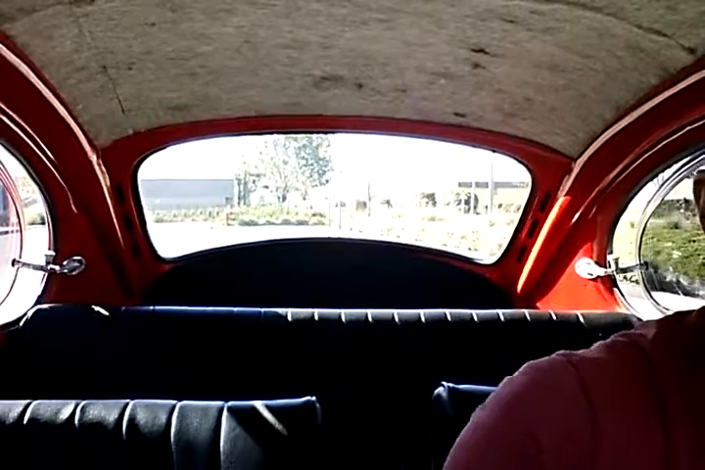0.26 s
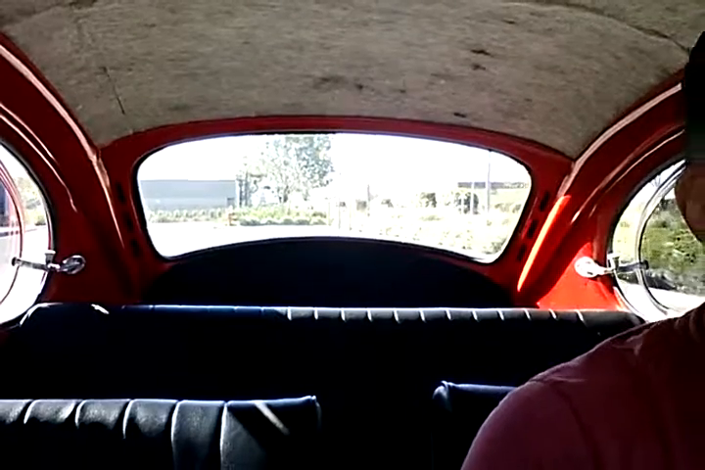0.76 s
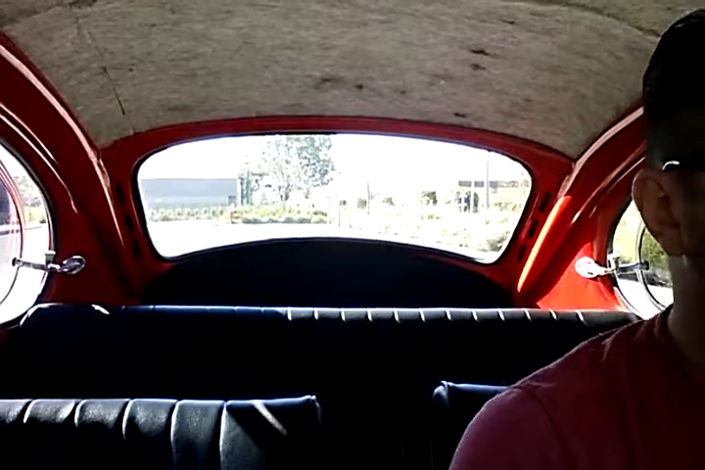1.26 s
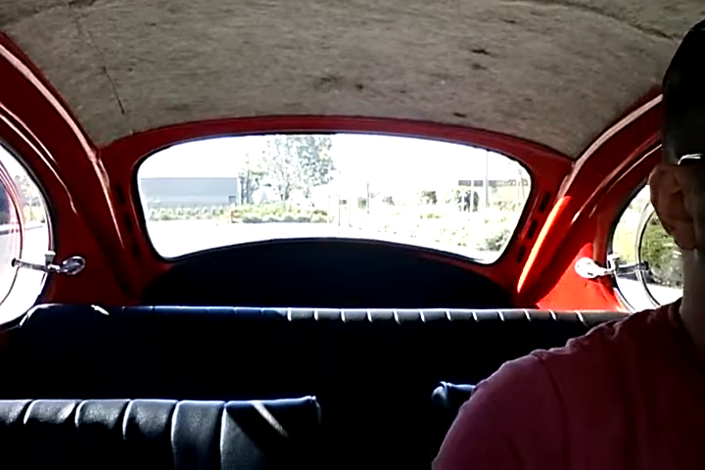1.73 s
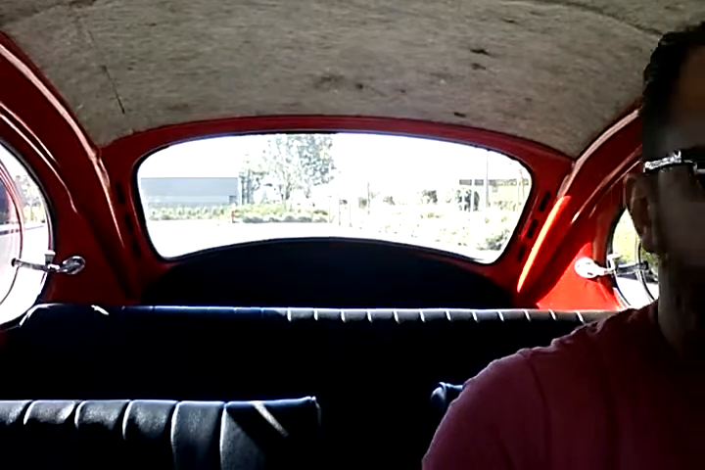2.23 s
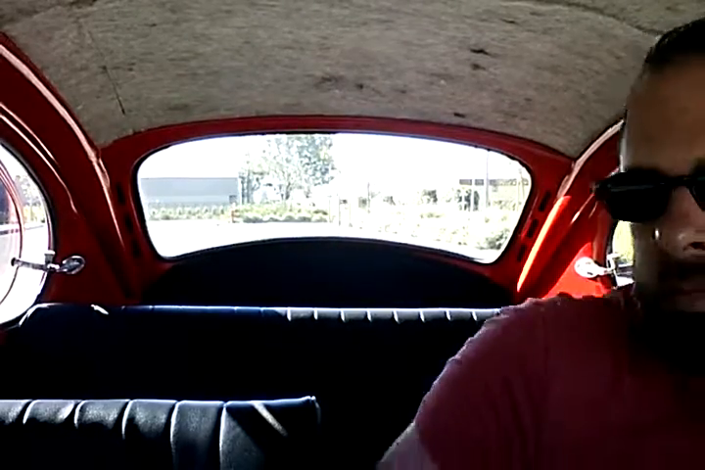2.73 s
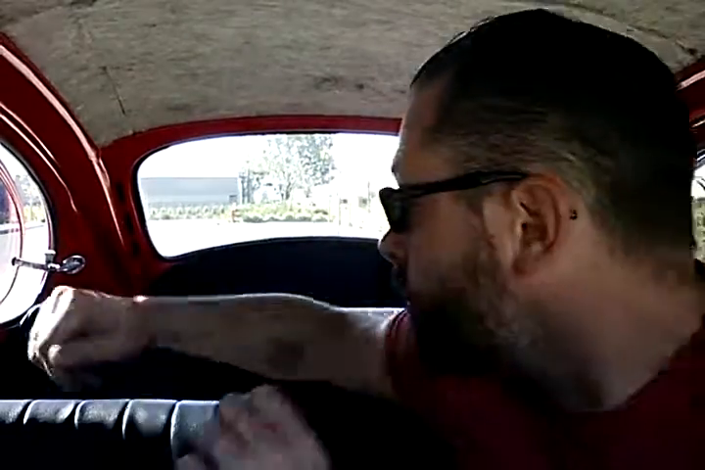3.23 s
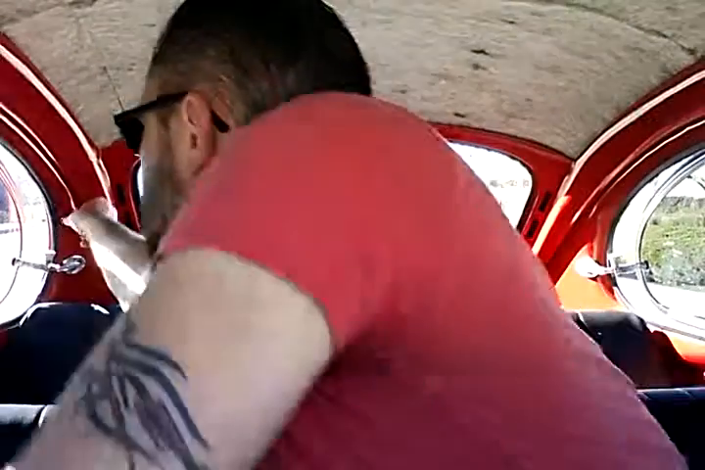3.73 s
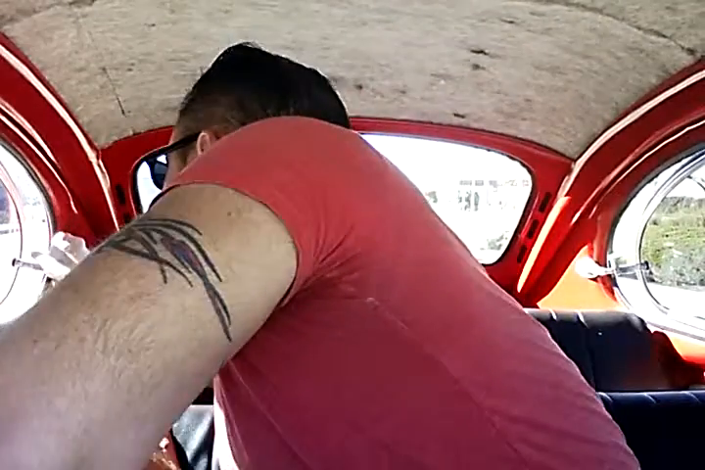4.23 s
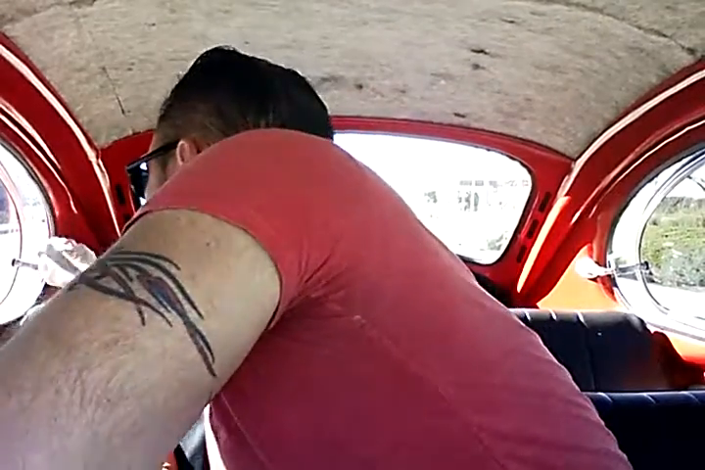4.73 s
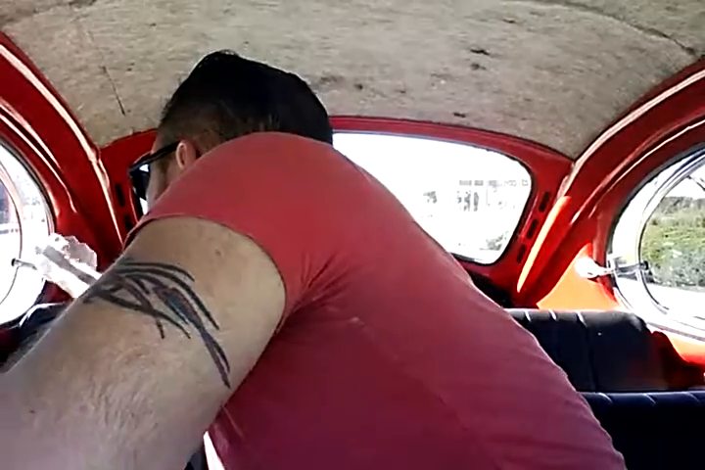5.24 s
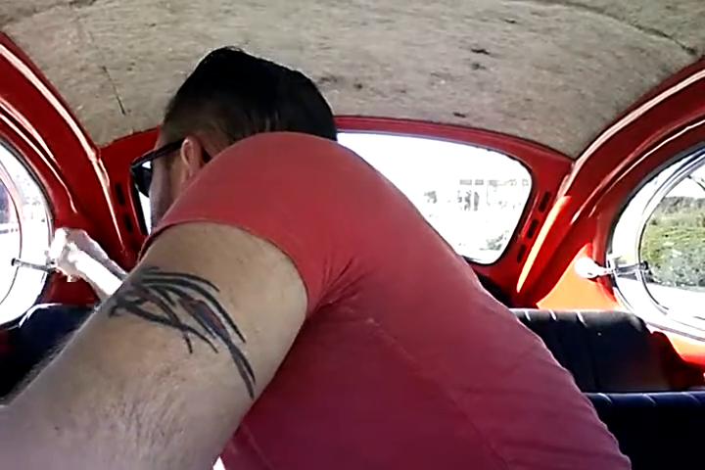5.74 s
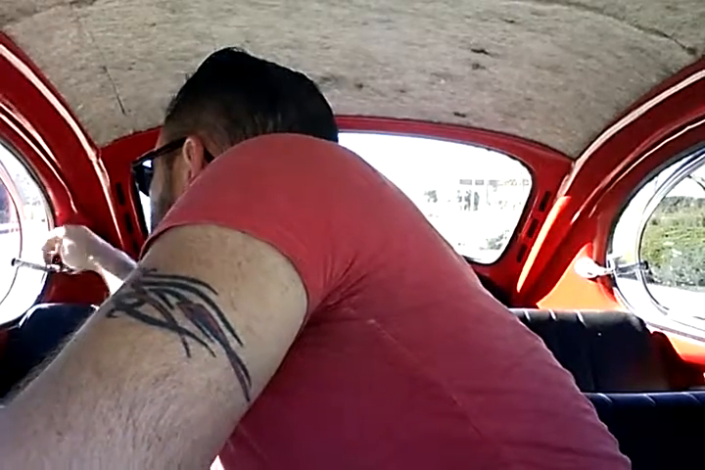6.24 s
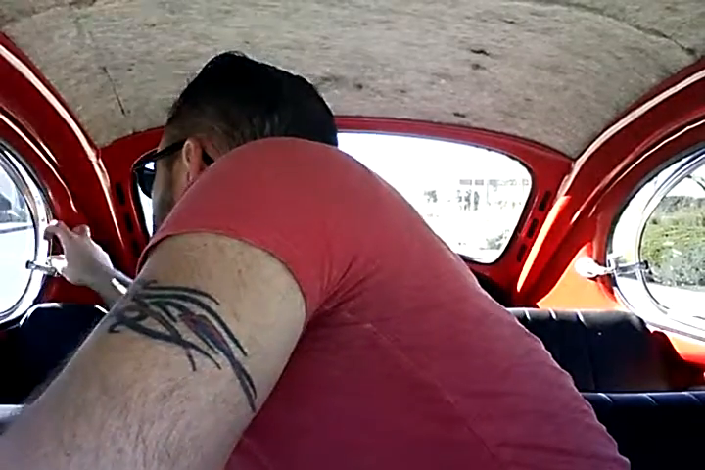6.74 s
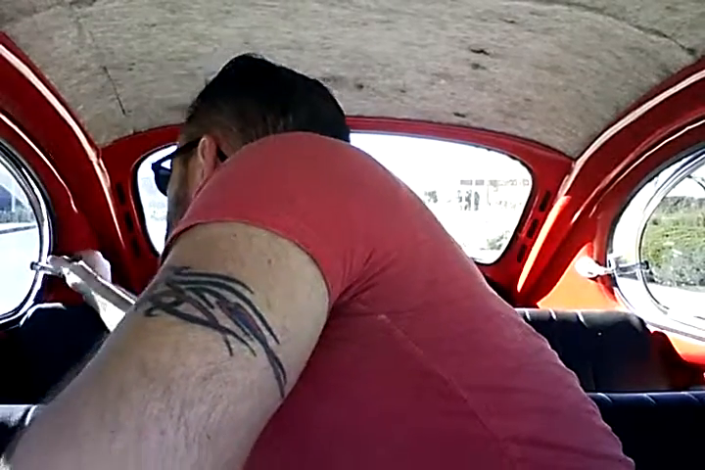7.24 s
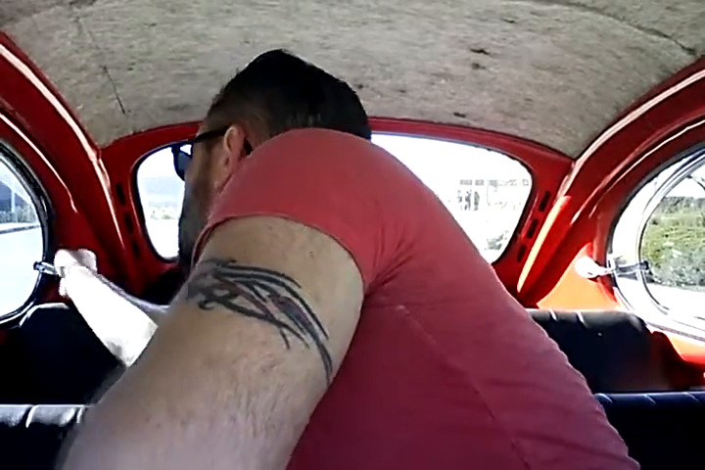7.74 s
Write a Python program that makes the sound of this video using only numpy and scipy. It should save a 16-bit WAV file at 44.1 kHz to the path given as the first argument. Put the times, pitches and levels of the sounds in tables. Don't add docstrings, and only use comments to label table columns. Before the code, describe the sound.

A small old car's air-cooled engine idles unevenly behind the seats, booming low with panel drone, valve ticking and faint fan whir. Close to the microphone, light clicks give way to hard buckle snaps, vinyl squeaks and cloth rustle around two to three seconds. A heavy body lands on the springs, then dull thumps. Later, a hand knocks the window and its latch clicks, with a tiny high metallic zing near seven seconds.

```python
import sys
import numpy as np
from scipy import signal
from scipy.fft import rfft, irfft
from scipy.io import wavfile
from scipy.ndimage import uniform_filter1d

SR = 44100
rng = np.random.default_rng(int(sys.argv[2]) if len(sys.argv) > 2 else 0)


def gain_from_db(level_db):
    decades = np.asarray(level_db, float) / 20
    return 10 ** decades


def store_wav(level_fs):
    pcm = np.round(np.clip(np.atleast_2d(level_fs), -1, 1) * 32767)
    wavfile.write(sys.argv[1], SR, pcm.T.astype(np.int16))


N = 351918
T = np.arange(N) / SR

# pitch in Hz, width in Hz, gain over the drone in dB.
PANELS = [(166, 110, 4.5), (228.6, 30, 0.5), (283.3, 11, 4), (515.7, 62, 7.5), (690, 36, 13),
          (810.4, 27, 9.5), (1010, 6.6, 7), (1208, 130, 5.5), (2212, 60, 10), (2470, 71, 4.5),
          (3700, 95, -3.5)]
# time in seconds, level in dB.
SHAKE = [(0, 3.5), (1.1, 7), (1.3, 1), (2.6, 2), (2.75, 11), (3.6, 13), (4.1, -3), (5.0, 11.5), (5.42, 8),
         (5.6, 6), (6.0, 16.5), (6.2, -2.5), (6.38, 16), (6.48, -8), (6.63, 20.5), (6.8, 9.5), (7.3, 20),
         (7.98, 10.5)]
# time in seconds, gain in dB.
GAIN = [(0, -0.5), (0.65, -1.5), (0.8, -1.5), (1.5, 1.5), (2.1, 2.5), (2.45, -2), (2.7, 0), (3.5, -0.5),
        (4.1, -2), (4.3, -5.5), (4.6, -3.5), (5.2, -1.5), (5.55, 2), (6.2, 0), (6.5, 4), (7.0, -2.5),
        (7.55, -6.5), (7.98, -1)]
# start in seconds, level in dB, body pitch in Hz, t60 in seconds, upper ring in dB.
THUDS = [(2.097, -24, 183, 0.17, -14), (2.25, -25.5, 112, 0.14, -13), (2.709, -20, 376, 0.15, -6.5),
         (2.914, -26, 415, 0.076, 5), (3.262, -8.5, 261.5, 0.1, -8), (3.682, -10.5, 357, 0.09, -26),
         (4.162, -9, 250, 0.076, -31), (5.676, -18, 377, 0.11, -9), (5.848, -12.5, 399, 0.051, -5.5),
         (5.903, -24.5, 390, 0.051, -32), (6.021, -14.5, 266.5, 0.099, -27), (6.35, -22.5, 390, 0.095, -33),
         (6.537, -28, 122, 0.061, 1), (6.666, -12, 279, 0.14, -8), (6.881, -6.5, 395, 0.11, -10.5),
         (6.987, -12.5, 398, 0.086, -18), (7.149, -19, 358, 0.08, -37), (7.217, -20, 391.8, 0.22, -40),
         (7.374, -25, 357, 0.048, -36), (7.61, -16.5, 320, 0.047, -16), (7.891, -20.5, 387, 0.23, -3.5)]


def level(x):
    return x / np.sqrt(np.mean(x ** 2))


def columns(table):
    s, *rest = np.transpose(table)
    return [np.interp(T, s, c) for c in rest]


def ring(x, hz, width_hz):
    return signal.lfilter(*signal.iirpeak(hz, hz / width_hz, SR), x)


def colour(x, shape, peaks=()):
    f = np.fft.rfftfreq(len(x), 1 / SR) + 1
    hz, db = np.transpose(shape)
    db = np.interp(np.log(f), np.log(hz), db)
    for centre, width, gain in peaks:
        db = db + gain / (1 + (2 * (f - centre) / width) ** 2)
    return level(irfft(rfft(x) * gain_from_db(db), len(x)))


def padded(x, hz):
    return signal.sosfilt(signal.butter(4, hz, fs=SR, output="sos"), x)


def walk(rate, size=N):
    k = int(SR * size / N / rate)
    held = np.repeat(rng.standard_normal(4000)[:size // k + 1], k)
    return uniform_filter1d(uniform_filter1d(held, k), k)[:size]


def patchy(bands_hz, rate, flicker_db):
    noise, t = rng.standard_normal(N), T[::16]
    out = 0
    for hz in bands_hz:
        flicker = gain_from_db(flicker_db * walk(rate, size=len(t)))
        out = out + ring(np.roll(noise, int(hz) * 20), hz, hz / 3) * np.interp(T, t, flicker)
    return out


def fall(t60, attack, size=SR // 2):
    t = T[:size]
    return (1 - np.exp(-t / attack)) * gain_from_db(-60 * t / max(t60, .005))


def strokes(table):
    t, total = T[::32], 0
    for s, length, db in table:
        u = (t - s) / length
        total = total + np.clip(u / 0.19, 0, 1) * gain_from_db(db - 21 * np.maximum(u - 1, 0))
    return np.interp(T, t, total)


def add(out, s, x):
    i = int(s * SR)
    out[i:i + len(x)] += x[:N - i]


def microphone_hiss():
    return gain_from_db(-92.5) * rng.standard_normal(N)


def firing_count():
    # time in seconds, crank speed in turns a second.
    crank_speed = [(0, 13.185), (3.2, 13.185), (3.4, 13.095), (6.9, 13.095), (8, 12.95)]
    return 2 * (.39 + np.cumsum(columns(crank_speed)[0]) / SR)


def idle_lumps():
    # time in seconds, level in dB.
    lumps = [(0.0, -1), (0.18, -20), (0.7, -31), (0.97, 4), (1.6, 7.5), (1.88, 6.5), (2.04, -29),
             (2.12, 2.5), (2.21, -16), (2.28, 4), (2.36, -23), (3.1, 8), (3.71, 9), (4.19, 17), (4.378, -4),
             (4.69, 5.5), (5.171, -1.5), (5.51, 14.5), (5.7, -12), (5.78, 3.5), (6.272, 13.5), (6.43, -10),
             (6.53, 3.5), (6.65, 3), (6.75, -1.5), (6.83, 10.5), (7.22, 12), (7.38, 11.5), (7.54, -5),
             (7.821, 17),
             (0.06, -6), (0.49, 6), (0.6, -4), (0.79, 7), (1.02, -1), (1.32, -16), (1.55, 7), (1.76, -7),
                (2.01, 5), (2.87, -2), (3.01, -21), (3.18, -8), (3.37, 20), (3.59, -10), (3.81, 8),
                (3.89, -5.5), (3.98, 8), (4.08, 8.5), (4.47, 6.5), (4.96, -12.5), (5.1, 4), (5.3, 4),
                (5.411, 6), (5.84, -7), (6.03, -9), (6.12, 9), (6.2, 5), (7.13, 13.5), (7.28, -5),
                (7.76, -3)]
    t = T[::32]
    return np.interp(T, t, sum(db * np.exp(-((t - s) / 0.025) ** 2) for s, db in lumps))


def cabin_boom(firing):
    cylinder_db = [0.5, -8, -0.5, -10]
    # pitch in Hz, width in Hz, level in dB.
    cabin_modes = [(50.7, 5.8, -3.5), (68.2, 19, -1.5), (79.1, 17, 3.5), (134.8, 7.3, -12.5),
                   (156.5, 15, -14.5), (187, 6.8, -17.5)]
    at = np.flatnonzero(np.diff(np.floor(firing)))
    timing, strength = rng.standard_normal((300, 2))[:len(at)].T
    late = np.clip(at + (0.0014 * SR * timing).astype(int), 0, N - 1)
    cylinder = np.floor(firing[at + 1]).astype(int) % 4
    pulses = np.zeros(N)
    pulses[late] = gain_from_db(np.array(cylinder_db)[cylinder] + 2.6 * strength)
    boom = 0
    for k, (hz, width_hz, db) in enumerate(cabin_modes):
        boom = boom + (-1) ** k * gain_from_db(db) * ring(ring(pulses, hz, width_hz), hz, 3 * width_hz)
    return boom


def panel_drone(boom, throb):
    # pitch in Hz, level in dB per Hz.
    drone_shape = [(18, -44.5), (30, -9.5), (76, -0.5), (108, -11.5), (160, -8.5), (351, -10.5), (386, -8),
                   (749, -28.5), (823, -23), (1300, -35), (1690, -60), (2860, -120)]
    kick = level(uniform_filter1d(np.abs(boom), SR // 50)) ** 0.32
    shake = patchy(40 * 2 ** np.arange(0, 6, .5), 35, 5.05) * gain_from_db(1.3 * walk(40)) * throb * kick
    return colour(shake, drone_shape, PANELS)


def valve_buzz(ticks):
    # pitch in Hz, level in dB per Hz.
    buzz_shape = [(530, -31), (900, 0.5), (1220, -7), (1380, -10.5), (1530, -7.5), (1960, -4.5),
                  (2290, -8.5), (2670, -9), (3890, -18), (4250, -23), (9000, -54.5), (11700, -74),
                  (19800, -120)]
    return colour(ticks, buzz_shape, PANELS)


def cooling_fan(ticks):
    fan = ring(ring(ticks, 5600, 1700), 5600, 1800)
    return level(fan / uniform_filter1d(np.abs(fan) + 1e-9, SR // 40) ** 0.81)


def engine():
    lump_db, shake_db = idle_lumps(), columns(SHAKE)[0]
    firing = firing_count()
    throb = 1 + 0.9 * np.exp(-(firing % 1) / 0.27)
    boom = cabin_boom(firing)
    drone = panel_drone(boom, throb) * gain_from_db(-36 + 0.13 * lump_db + 0.33 * shake_db)
    ticks = patchy(600 * 2 ** np.arange(0, 4.5, .5), 60, 5.5) * gain_from_db(1.5 * walk(90)) * throb
    buzz = valve_buzz(ticks) * gain_from_db(-50.5 + 0.11 * lump_db + 0.2 * shake_db)
    beat_db = 4 * (np.cos(np.pi * firing - 2 * np.pi * .33) - .5)
    return level(boom) * gain_from_db(-32 + lump_db + beat_db) + drone + buzz + gain_from_db(-75) * cooling_fan(ticks)


def window_pane():
    push = rng.standard_normal(N) * gain_from_db(1.1 * walk(25))
    drive = gain_from_db(-53.5 + columns(SHAKE)[0])
    for s, db, *_ in THUDS:
        if s > 5:
            add(drive, s, gain_from_db(db - 21) * fall(0.43, 0.0069))
    return level(ring(push, 391.8, 4.6)) * drive


def rattles():
    out = 0
    for hz, *_ in PANELS[2:]:
        chatter = rng.standard_normal(N) * gain_from_db(9.2 * walk(28))
        burble = ring(ring(chatter, hz, 30 + 0.045 * hz), hz, 3 * (30 + 0.055 * hz))
        out = out + level(burble) * gain_from_db(-50 - 6.5 * np.log2(hz / 500))
    return out * gain_from_db(0.14 * columns(SHAKE)[0])


def hums():
    # middle in seconds, level in dB, pitch in Hz.
    hum_table = [(0.085, -33, 503), (0.305, -31.5, 510), (0.383, -26, 155), (0.612, -28, 160),
                 (1.454, -30, 167), (1.753, -31, 171), (1.823, -28.5, 151), (2.7, -27, 134),
                 (2.815, -28.5, 388), (5.188, -32.5, 386), (5.416, -24.5, 380), (5.441, -30, 151),
                 (5.488, -31.5, 389), (5.567, -34.5, 517), (5.581, -32, 325), (5.581, -32, 269),
                 (5.605, -24, 136), (5.64, -32, 375), (5.645, -31, 280), (5.686, -35, 517),
                 (5.805, -26, 125), (5.849, -31, 298), (5.854, -32, 525), (6.023, -28.5, 156),
                 (6.028, -27, 405), (6.031, -28.5, 268), (6.287, -31.5, 250), (6.306, -32.5, 550),
                 (6.391, -30, 124.6), (6.545, -30.5, 531), (6.757, -29.5, 394), (6.928, -33.5, 289),
                 (7.065, -28, 379), (7.314, -29, 292), (7.329, -32, 382), (7.378, -33.5, 390),
                 (7.459, -33, 386), (7.635, -33.5, 514), (7.816, -33, 405)]
    out, t = np.zeros(N), T[:SR // 8] - 1 / 16
    for s, db, hz in hum_table:
        add(out, s - 1 / 16, gain_from_db(db) * np.exp(-(t / 0.019) ** 2) * np.sin(2 * np.pi * hz * t))
    return out


def engine_clatter():
    # pitch in Hz, level in dB.
    loose_parts = [(530, -43.5), (700, -45), (812, -46), (1010, -47.5), (1150, -48), (1290, -50.5),
                   (1450, -53.5), (1610, -52.5), (2230, -53.5), (2470, -54.5), (2680, -56.5), (2950, -57),
                   (3450, -61), (3900, -62.5)]
    shake_db = columns(SHAKE)[0] + 3 * columns(GAIN)[0]
    when, which, size, detune = rng.random((1500, 4)).T
    when = when * T[-1]
    part_hz, part_db = np.array(loose_parts)[(which * len(loose_parts)).astype(int)].T
    knock_db = part_db - 3 * np.log(.07 + size) + .25 * np.interp(when, T, shake_db)
    return zip(when, knock_db, part_hz * (1 + 0.056 * (detune - .5)))


def taps():
    # start in seconds, level in dB, pitch in Hz.
    tap_table = [(0.28, -32, 1010), (1.19, -37, 3900), (1.224, -29, 2700), (1.4027, -35, 1410),
                 (1.4596, -33, 2450), (1.662, -32.5, 1190), (1.992, -34, 1225), (2.158, -22, 3410),
                 (2.371, -33, 865), (2.385, -36, 3600), (2.4034, -27, 3410), (2.8614, -23, 955),
                 (3.0824, -35, 1310), (3.1657, -39, 1240), (3.2355, -26, 956), (3.644, -40, 696),
                 (3.688, -34, 950), (3.8745, -34.5, 1020), (3.9635, -30, 1020), (4.0247, -30, 1020),
                 (4.21, -34, 1010), (4.31, -31, 704), (5.3787, -29.5, 1010), (5.5702, -27.5, 1130),
                 (5.8456, -25, 930), (5.9317, -28, 926), (6.03, -33, 2330), (6.2367, -36, 1194),
                 (6.352, -30, 1460), (6.4103, -34, 1184), (6.5291, -34, 2000), (6.565, -34, 2900),
                 (6.7451, -31, 1250), (6.9905, -29, 595), (7.115, -31, 914), (7.221, -31, 600),
                 (7.7628, -29, 920), (7.801, -34, 2960), (7.8915, -21, 900)]
    out, t = np.zeros(N), T[:SR // 20]
    waver = np.pad(np.cumsum(walk(300)) / SR, (0, len(t)), "edge")
    for rows, t60 in ((tap_table, 0.06), (engine_clatter(), .04)):
        shape = fall(t60, 0.0022, size=len(t))
        for s, db, hz in rows:
            bent = t + .015 * waver[int(s * SR):][:len(t)]
            add(out, s, gain_from_db(db) * shape * np.sin(2 * np.pi * hz * bent))
    return out * gain_from_db(4 * walk(500))


def slumps():
    # start in seconds, level in dB, t60 in seconds.
    slump_table = [
        (0.07, -31.5, 0.35),
        (2.25, -30, 0.29),
        (3.682, -20.5, 0.27),
        (4.158, -16.5, 0.24),
        (5.6, -23, 0.23),
        (7.89, -26, .2),
    ]
    out, foam = np.zeros(N), padded(rng.standard_normal(SR // 2), 670)
    low = level(ring(ring(foam, 150, 60), 148, 110))
    groan = low + 0.44 * level(ring(ring(foam, 294, 182), 296, 300))
    for s, db, t60 in slump_table:
        add(out, s, gain_from_db(db) * groan * fall(t60, 0.0039))
    return out


def rustle():
    # start in seconds, length in seconds, level in dB.
    rub_table = [(0.016, 0.35, -86), (1.176, 0.047, -42), (1.29, 0.21, -75), (2.229, 0.022, -27.5),
                 (2.287, 0.31, -58), (2.368, 0.014, -31.5), (2.613, 0.23, -43.5), (2.93, 0.09, -40.5),
                 (3.026, .2, -49.5), (3.272, 0.082, -50.5), (3.4, 0.48, -72), (3.503, 0.059, -50.5),
                 (4.052, 0.021, -68.5), (5.684, 0.026, -59), (5.72, 0.17, -72), (6.284, 0.18, -79),
                 (6.644, .07, -66), (6.882, 0.035, -66), (7.043, 0.066, -51.5), (7.157, 0.03, -60.5),
                 (7.504, 0.088, -72), (7.76, 0.14, -65)]
    rub_air_db = [3, -1, -4, -4.5, -3.5, 3, -4, 2.5, 1, -3.5, 6.5, 4.5, 3, 0.5, 4, 5, 0, -1, -3.5, 8, 4, 4]
    # pitch in Hz, level in dB per Hz.
    cloth_shape = [(2060, -26.5), (3500, -16.5), (5200, -14), (7290, 1.5), (8680, -0.5), (14800, 4.5),
                   (16100, -3), (16500, -31.5)]
    fibres = patchy(2500 * 2 ** np.arange(0, 3, .5), 25, 2.5)
    hiss = colour(fibres * gain_from_db(1.2 * walk(60) + 2.2 * walk(400)), cloth_shape)
    dull = signal.sosfilt(signal.butter(2, 13000, fs=SR, output="sos"), hiss)
    rubs = [(*rub, air) for rub, air in zip(rub_table, rub_air_db)]
    dull_strokes = strokes([(s, length, db - 0.79 * air) for s, length, db, air in rubs])
    airy_strokes = strokes([(s, length, db + 0.68 * air) for s, length, db, air in rubs])
    return dull * dull_strokes + (hiss - dull) * airy_strokes + hiss * gain_from_db(-84)


def scrapes():
    # start in seconds, length in seconds, level in dB.
    scrape_table = [(1.2, 0.063, -46), (2.378, 0.032, -38.5), (2.57, 0.092, -43), (2.72, 0.2, -45.5),
                    (3.27, 0.099, -40), (3.5, 0.47, -58.5), (5.3, 0.26, -50), (5.78, 0.069, -43.5),
                    (5.93, 0.022, -40), (6.02, 0.017, -43), (6.23, 0.062, -51.5), (6.26, 0.15, -47.5),
                    (6.345, 0.034, -42.5), (6.52, 0.091, -48.5), (6.66, 0.033, -45), (6.44, 0.028, -49.5),
                    (6.625, 0.038, -42.5), (6.71, 0.039, -49), (7.86, 0.065, -46.5)]
    ticks = rng.standard_normal(N) * gain_from_db(7 * walk(180))

    def band(hz, width_hz):
        return ring(ring(ring(ticks, hz, width_hz), hz, width_hz), hz, width_hz)

    metal = band(1464, 900) + 0.66 * band(3140, 1000) + 0.064 * band(4600, 1500)
    return level(metal) * strokes(scrape_table)


def squeaks():
    # start in seconds, length in seconds, start pitch in Hz, end pitch in Hz, level in dB.
    squeak_table = [
        (1.274, 0.027, 1340, 1485, -37),
        (2.161, 0.043, 1180, 1189, -27.5),
        (2.197, 0.01, 1138, 1140, -28),
        (2.378, 0.043, 1213, 1458, -32.5),
        (2.66, 0.061, 1372, 1610, -34.5),
        (7.272, 0.039, 1108, 1517, -28),
    ]
    out, grip = np.zeros(N), gain_from_db(5.7 * walk(390))
    wobble_hz = 150 * walk(500)
    for s, length, hz0, hz1, db in squeak_table:
        u, i = np.linspace(0, 1, int(length * SR)), int(s * SR)
        hz = hz0 + (hz1 - hz0) * np.sqrt(u) + wobble_hz[i:][:len(u)]
        turn = 2 * np.pi * np.cumsum(hz) / SR
        overtones = np.sin(2 * turn) + 0.17 * np.sin(2.5 * turn)
        tone = np.sin(turn) + gain_from_db(-11 * hz0 / 1000) * overtones
        swell = np.sin(np.pi * u ** .45)
        add(out, s, gain_from_db(db) * tone * swell * grip[i:][:len(u)])
    return out


def thuds():
    # time in seconds, level in dB.
    seat_blow = (3.297, -14)
    # pitch in Hz, level in dB, t60 in seconds.
    seat_modes = [(125.2, 3, 0.39), (166.7, -2.5, 0.4), (255, -7.5, 0.47), (328, -6, 0.23), (566, -11, 0.3),
                  (1160, -19, 0.15)]
    out, t = np.zeros(N), T[:SR // 2]
    felt = padded(rng.standard_normal(N), 1500)
    pad = level(ring(ring(felt, 610, 530), 700, 900))
    soft = level(ring(ring(felt, 380, 220.0), 380, 300))
    for s, db, hz, t60, upper_db in THUDS:
        turn = 2 * np.pi * hz * t
        body = np.sin(turn) + .5 * np.sin(0.438 * turn) * (hz < 385) + 0.38 * np.sin(1.37 * turn)
        i = min(int(s * SR), N - len(t))
        padding = 0.3 * soft[i:i + len(t)] + gain_from_db(upper_db) * pad[i:i + len(t)]
        add(out, s, gain_from_db(db - 1.5) * (body + padding) * fall(t60, 0.004))
    seat_s, seat_db = seat_blow
    add(out, seat_s, gain_from_db(seat_db - 10.5) * (pad + soft)[:len(t)] * fall(0.36, 0.0053))
    for hz, db, t60 in seat_modes:
        unsteady_db = hz / 120 * walk(52)[:len(t)]
        add(out, seat_s, gain_from_db(seat_db + db + unsteady_db) * np.sin(2 * np.pi * hz * t) * fall(t60, 0.0021))
    return out


def clicks():
    # start in seconds, sizzle in dB, ring in dB, ring pitch in Hz.
    buckle_clicks = [(0.0503, -49, -67, 1000), (0.2794, -51, -52, 1010), (0.5921, -44, -47, 1780),
                     (0.7053, -27.5, -56, 1030), (1.1817, -18.5, -33, 1680), (1.2161, -21.5, -31.5, 2380),
                     (1.2735, -36, -39, 1490), (1.4634, -38.5, -32, 1600), (2.1565, -11.5, -15, 1190),
                     (2.1994, -27, -27, 1190), (2.2218, -17.5, -32, 2070), (2.2338, -13, -23.5, 2470),
                     (2.3765, -17, -31, 3370), (2.4044, -35, -32.5, 1410), (2.6913, -22, -22, 1510),
                     (2.7117, -9.5, -13.5, 1670), (2.7521, -15, -23, 1940), (2.7994, -26.5, -32, 980),
                     (2.8345, -19.5, -21.5, 2900), (2.8883, -15, -24, 2470), (2.9144, -12.5, -14, 3200),
                     (2.9228, -7.5, -19, 2980), (3.1971, -24, -31, 1040), (3.246, -18, -21, 1003),
                     (3.2615, -8, -13, 1150), (3.2994, -41, -15.5, 1150), (3.3494, -57, -31, 1400),
                     (3.4565, -25.5, -33, 1080), (3.5109, -50, -33, 2280), (3.5533, -47, -34, 1030)]
    # start in seconds, sizzle in dB, ring in dB, ring pitch in Hz.
    latch_clicks = [(5.673, -15.5, -21, 1580), (5.803, -52, -34, 2940), (5.8451, -37.5, -23, 2900),
                    (5.930, -43, -25, 2840), (5.995, -66, -37, 3000), (6.0224, -63.5, -23, 3200),
                    (6.2911, -52.5, -33, 1010), (6.318, -64.5, -49.5, 2970), (6.347, -62, -31, 2900),
                    (6.4624, -65.5, -34, 3040), (6.5311, -46, -28.5, 3240), (6.6263, -54, -22.5, 3180),
                    (6.6495, -24.5, -13.5, 3050), (6.718, -64.5, -33, 2900), (6.746, -59.5, -34.5, 2730),
                    (6.8785, -12, -14, 3250), (6.9875, -34.5, -44, 5000), (7.0514, -39, -53, 1660),
                    (7.1671, -32.5, -50, 1440), (7.2206, -48, -49, 1000), (7.42, -69, -51, 2590),
                    (7.5194, -62, -39, 1230), (7.7263, -23.5, -27, 3540), (7.7994, -62, -33.5, 1020),
                    (7.8924, -53, -28.5, 2180), (7.9069, -17, -17, 1420)]
    buckle_shine_hz = [13000, 13000, 13500, 11500, 14500, 13100, 6300, 5000, 10000, 10020, 12000, 7800,
                       9200, 7800, 6520, 5060, 6180, 9160, 6020, 5180, 8000, 9030, 13500, 14000, 8450,
                       13000, 13500, 14300, 8000, 8000]
    latch_shine_hz = [6900, 6050, 5150, 6300, 6000, 6000, 6000, 6000, 6000, 6000, 5130, 6000, 12500, 6000,
                      6000, 8600, 5100, 8000, 13500, 8000, 8000, 13000, 6500, 5970, 6000, 5530]
    # pitch in Hz, level in dB per Hz.
    sizzle_shape = [(2060, -27.5), (3500, -2.5), (3910, -9.5), (5200, 1.5), (5660, 2.5), (11500, 2.5),
                    (15800, -1), (16200, -26), (16500, -57.5)]
    out, n = np.zeros(N), SR // 5
    grit = patchy(2500 * 2 ** np.arange(0, 2.7, 1 / 3), 200, 4.5)
    bright = colour(grit, sizzle_shape) * gain_from_db(walk(190))
    raw = signal.sosfilt(signal.butter(6, 4600, fs=SR, output="sos"), rng.standard_normal(N))
    buckle = buckle_clicks, buckle_shine_hz, 300, .3, .085
    latch = latch_clicks, latch_shine_hz, 450, .4, .065
    for table, shines, width_hz, stiff, ring_t60 in (buckle, latch):
        for (s, sizzle_db, ring_db, hz), shine_hz in zip(table, shines):
            i = min(int(s * SR), N - n)
            hiss, knock = bright[i:i + n], raw[i:i + n]
            scrape = hiss + 2.02 * ring(hiss, shine_hz, 0.21 * shine_hz)
            sizzle_t60 = 0.058 * (1 + 0.003 * (sizzle_db + 39.0))
            crack = 3.4 * np.clip((sizzle_db + 25) / 13.5, 0, 1)
            shape = fall(sizzle_t60, 0.0031, size=n) + crack * fall(0.006, 0.00042, size=n)
            add(out, s, gain_from_db(sizzle_db - 17) * scrape * shape)
            part = ring(knock, hz, width_hz) + stiff * (ring(knock, 2870, 900) + ring(knock, 1900, 840))
            add(out, s, gain_from_db(ring_db - 4.0) * level(part) * fall(ring_t60, 0.0037, size=n))
            ping = np.sin(2 * np.pi * hz * T[:n]) * fall(0.02, 0.00035, size=n)
            add(out, s, gain_from_db(ring_db - 2) * ping)
    return out


def snaps():
    # start in seconds, level in dB, pitch in Hz.
    snap_table = [
        (2.1576, -17, 9800),
        (2.2392, -17, 8200),
        (2.7122, -10.5, 5300),
        (2.7125, -15, 8950),
        (2.7526, -19, 5900),
        (2.9233, -9, 9800),
        (3.2619, -8.5, 9000),
        (5.848, -32, 5120),
        (7.7267, -32, 3700),
    ]
    out, shape = np.zeros(N), fall(.006, 0.00026, size=800)
    for s, db, hz in snap_table:
        add(out, s, gain_from_db(db + 2.5) * shape * np.sin(2 * np.pi * hz * T[:len(shape)]))
    return out


def zing():
    # middle in seconds, length in seconds, level in dB, pitch in Hz.
    bite_table = [
        (7.0525, 0.0059, -18.5, 11800),
        (7.0565, 0.0018, -17.5, 12200),
        (7.061, 0.0024, -22, 12200),
        (7.0668, .005, -21.5, 11850),
        (7.075, 0.011, -35, 11850),
    ]
    out, t = np.zeros(N), T[:SR // 32] - 1 / 64
    for s, length, db, hz in bite_table:
        add(out, s - 1 / 64, gain_from_db(db) * np.exp(-(2 * t / length) ** 2) * np.sin(2 * np.pi * hz * t))
    return out


def cabin_echo(x, t60, wet_db):
    tail = rng.standard_normal(SR // 2) * fall(t60, 0.003)
    return x + gain_from_db(wet_db) * signal.fftconvolve(x, tail / np.linalg.norm(tail))[:N]


def camera_gain(near):
    knee_db, slope, duck_s = -35.5, 0.39, 0.054
    p = np.exp(-1 / (duck_s * SR))
    loud = signal.lfilter([(1 - p) ** 2], [1, -2 * p, p * p], np.abs(near))
    return gain_from_db(columns(GAIN)[0]) * (1 + np.abs(loud) / gain_from_db(knee_db)) ** -slope


def scene():
    near = cabin_echo(clicks() + thuds() + squeaks() + snaps(), t60=0.14, wet_db=-13.0)
    hiss = microphone_hiss()
    car = engine() + window_pane()
    cloth = rustle()
    car = camera_gain(near) * (car + rattles())
    mix = car + cloth + scrapes() + near + zing() + hiss + taps() + slumps() + hums()
    return mix[None]


def band_limit(x):
    return signal.sosfilt(signal.butter(12, 16980, fs=SR, output="sos"), x)


def record(dry):
    mix = signal.sosfilt(signal.ellip(6, .5, 25, 15900, fs=SR, output="sos"), dry)
    mix = signal.sosfilt(signal.butter(2, 35, "high", fs=SR, output="sos"), mix)
    return band_limit(mix)


dry = scene()
out = record(dry)
store_wav(out)
```